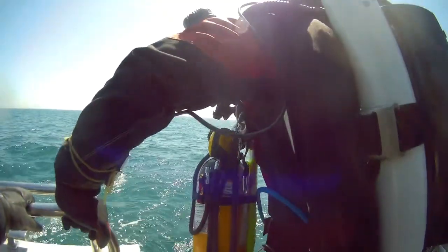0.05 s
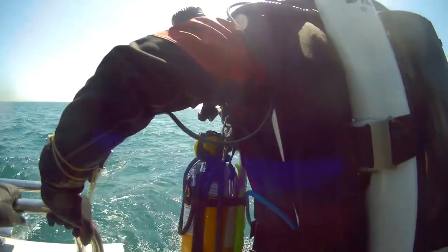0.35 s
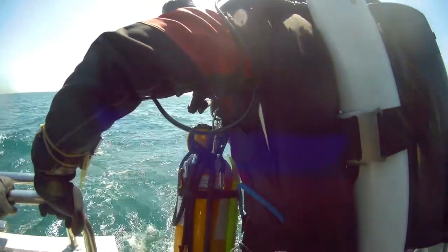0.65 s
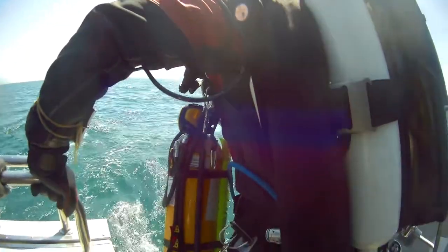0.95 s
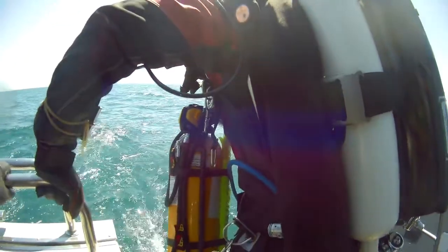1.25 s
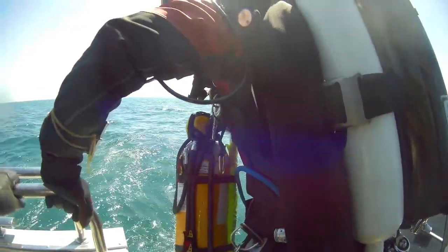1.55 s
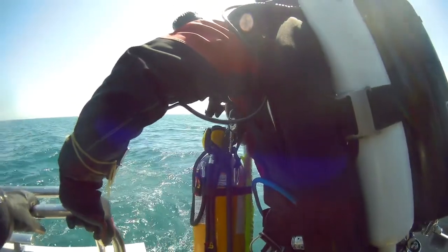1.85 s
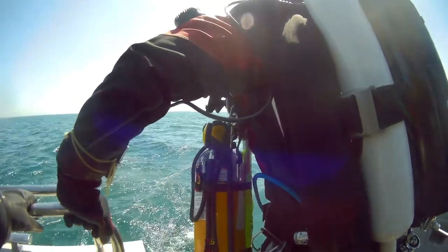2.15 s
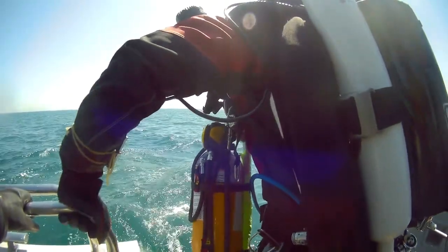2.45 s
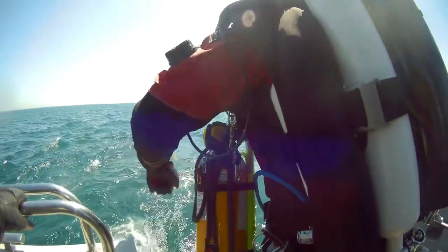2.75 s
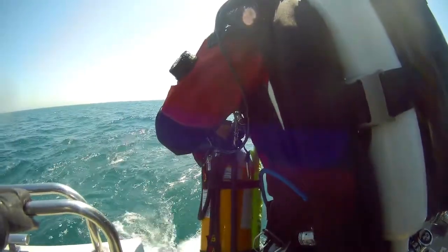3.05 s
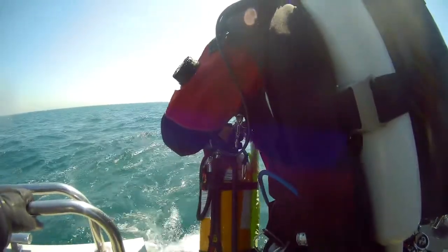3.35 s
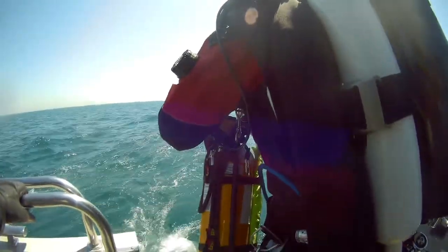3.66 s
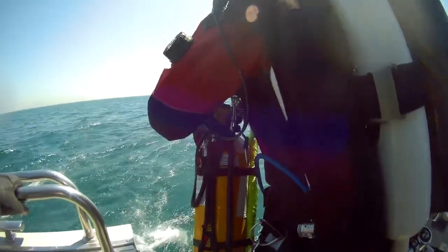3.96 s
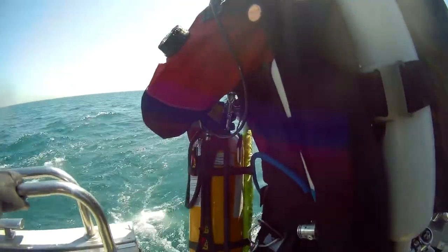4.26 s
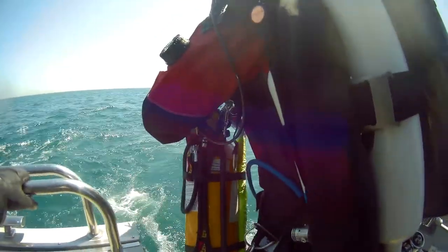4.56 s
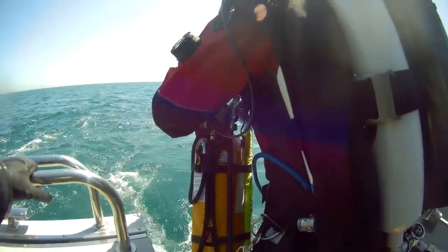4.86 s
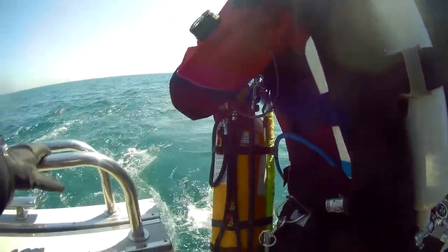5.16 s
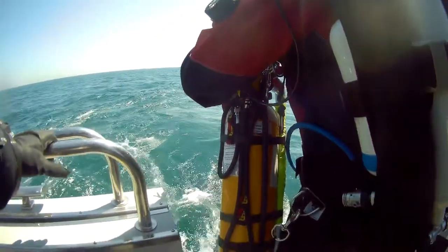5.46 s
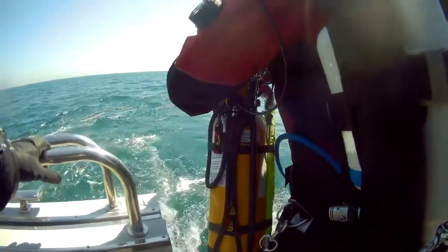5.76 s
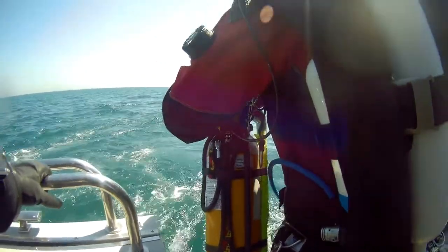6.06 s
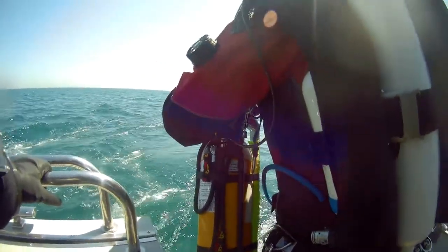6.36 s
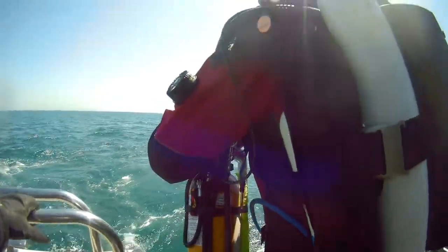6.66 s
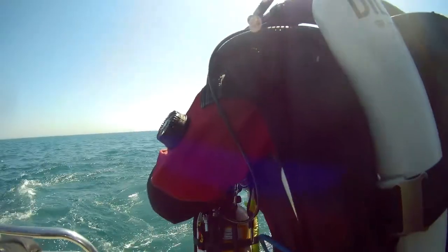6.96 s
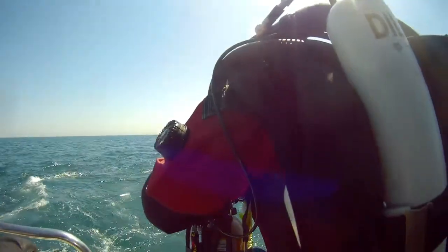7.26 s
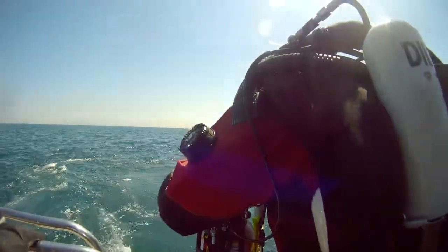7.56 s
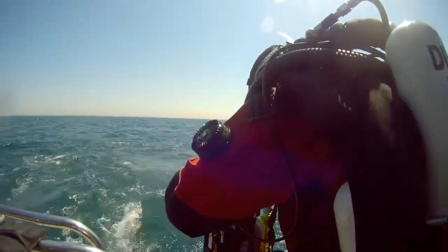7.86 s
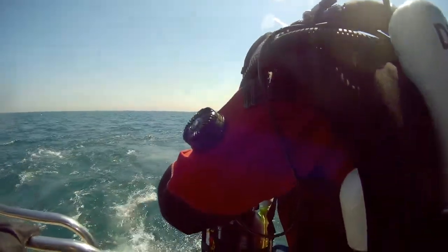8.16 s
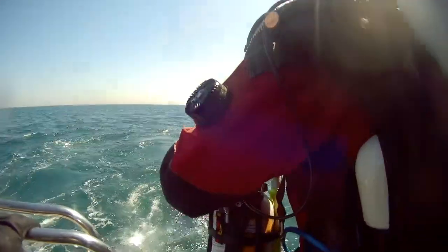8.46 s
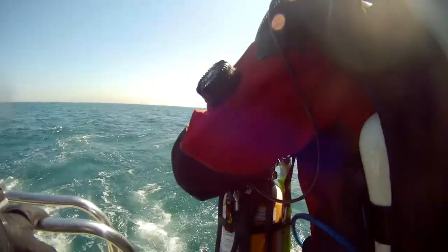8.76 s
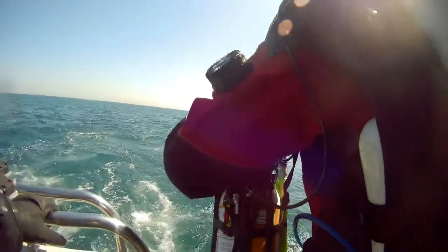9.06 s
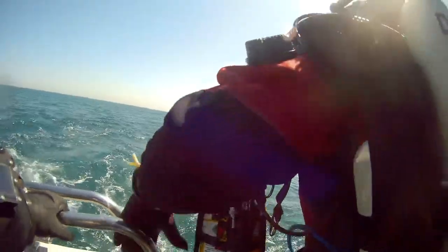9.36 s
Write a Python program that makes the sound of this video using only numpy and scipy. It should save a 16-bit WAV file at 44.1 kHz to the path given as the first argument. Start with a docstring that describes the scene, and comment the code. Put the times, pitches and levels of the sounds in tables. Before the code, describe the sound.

A camera housing clacks, thumps and scrapes on its mount while choppy sea washes faintly behind the plastic.

```python
"""The stern of a boat in a choppy sea, heard from inside a camera's waterproof case.
From the start, wake and wind come through the plastic as a faint wash. Within a second, jolts knock the
case: it clacks, its walls ring hollow, its mount thumps, and in between it rubs and judders.
A calmer stretch brings spray, soft bumps and ticks of loose gear. Around six seconds the knocks crowd
together, the hardest overloading the microphone. A few lighter ones end the scene as the wash swells."""
import sys
import numpy as np
from scipy import signal
from scipy.fft import rfft, irfft
from scipy.io import wavfile

SR = 44100
rng = np.random.default_rng(int(sys.argv[2]) if len(sys.argv) > 2 else 0)


def output_pcm(signal):
    """Save a mono or channel-first signal as 16-bit PCM at the path in sys.argv[1].

    Samples are clipped to [-1, 1] before scaling.
    """
    pcm = np.clip(np.atleast_2d(signal).T, -1, 1) * 32767
    wavfile.write(sys.argv[1], SR, np.round(pcm).astype(np.int16))


N = 423801
KNOCK_S, TOP_HZ = .02, 15900  # a typical knock's length; the highest pitch let through

# The tone of the sea through the plastic. Each row: frequency in Hz, relative level in dB.
SEA_TONE = [(20, 17), (65, 18), (130, 5), (300, 8.5), (750, 2), (1630, 12.5), (2250, -1.5), (2950, 4.5),
            (3200, -1.5), (3550, 1.5), (4050, 4.5), (4700, -6.5), (6000, 2.5), (7100, 1.5), (8000, 0),
            (9400, 2.5), (10300, -2), (16000, -18)]
# The wake's rush as the boat drives through the chop. Each row: time in seconds, relative level in dB.
WAKE_RUSH = [(0, -70), (2.35, -69), (2.95, -60), (3.6, -68), (4.3, -67), (5.7, -57.5), (6.6, -59.5),
             (7.3, -70), (8.1, -68.5), (9.6, -60.5)]
# Waves breaking along the hull. Each row: crest time and length in seconds, relative level in dB.
HULL_WAVES = [(0.616, 1, -61.5), (1.506, 0.69, -62.5), (4.487, 0.36, -60.5), (8.204, 0.42, -59),
              (8.509, 0.47, -59.5), (9.07, 0.47, -62)]
# The whine of the camera's electronics. Each row: pitch in Hz, level in dB.
CAMERA_WHINE = [(6857, -77)]
# Jolts that knock the case. Each row: start in seconds, levels of clack, crack, wall and thump in dB,
# pitches of clack and thump in Hz, contact time in seconds.
JOLTS = [(0.48, -28, -31.5, -36, -38, 1214, 83, .0022), (0.617, -29, -37, -42, -39.5, 1130, 112, 0.0024),
         (0.697, -35.5, -50, -44.5, -36.5, 1160, 114, 0.0019),
         (0.8258, -20.5, -38, -28.5, -34, 1400, 78.5, 0.0067),
         (0.838, -14, -18.5, -28.5, -14, 1400, 75, .0013),
         (1.452, -34.5, -49, -30.5, -30.5, 1315, 86, 0.0028),
         (1.504, -46.5, -67.5, -42.5, -39.5, 1160, 109.5, 0.0032),
         (2.075, -33, -54.5, -39.5, -30, 1277, 83.7, 0.0037),
         (3.752, -54.5, -62.5, -63, -45.5, 1312, 91, 0.0024),
         (4.435, -34, -49, -38, -35.5, 1276, 86.5, 0.0056),
         (4.474, -23.5, -39.5, -34.5, -32, 1310, 88, 0.0024),
         (4.751, -46.5, -59, -60, -35.5, 1430, 99.7, 0.002),
         (5.106, -18.5, -25, -24.5, -27, 1370, 103, 0.0023),
         (5.776, -18.5, -30, -29.5, -32.5, 1470, 94, 0.00307),
         (5.897, -19.5, -36, -24, -19.5, 1400, 86.6, 0.0051),
         (6.097, -30, -42, -34.5, -30, 1240, 86, 0.0019),
         (6.173, -20, -34.5, -31, -27.5, 1337, 85.5, 0.003),
         (6.39, -31, -53.5, -33.5, -26, 1330, 70, 0.0077),
         (6.415, -13, -28.5, -16, -25.5, 1358, 64, 0.0032),
         (6.567, -19.5, -35.5, -23, -19.5, 1284, 75.5, 0.0075),
         (6.591, -33, -54, -32.5, -23.5, 1210, 68, 0.0023),
         (6.609, -38.5, -66.5, -36.5, -27, 1230, 63, 0.0061),
         (6.664, -17, -31, -18, -17, 1233, 65.4, 0.0035), (6.753, -42, -54.5, -47.5, -33, 1220, 67, 0.011),
         (6.822, -54.5, -63, -49, -36.5, 1246, 69, 0.0049),
         (8.088, -33.5, -44.5, -32.5, -33.5, 1336, 82, 0.006),
         (8.183, -42, -56, -36, -43, 1240, 101, 0.0038), (8.529, -53, -66, -45, -45.5, 1310, 97, 0.0036),
         (8.891, -30, -42.5, -26.5, -25.5, 1260, 85.3, 0.0073),
         (9.405, -36, -63, -35.5, -26.5, 1220, 69.5, 0.0022)]
# The struck case's modes (the notes it rings at): a middle clack, a bright crack and the hollow walls.
# Each row: pitch in Hz, width in Hz (wider dies sooner), relative level in dB.
CLACK_MODES = [(1189, 53, -0.5), (1310, 120, 4), (1430, 110, -1.5), (1644, 120, 1), (1895, 440, -1.5)]
CRACK_MODES = [(2470, 200, -1), (2640, 240, 7.5), (3520, 340, 13), (3860, 140, 6), (5320, 280, -9),
               (6500, 1900, -10), (8100, 960, -13.5)]
WALL_MODES = [(170, 80, -8), (347, 21, 0.5), (440, 75, -3.5), (506, 23, 1), (585, 80, -6), (740, 50, -5.5)]
# The case rubs on its mount as the boat rolls.
# Each row: middle time and length in seconds, levels of scrape, wall and rasp in dB.
CASE_RUBS = [(0.552, 0.14, -40.5, -38, -50), (0.762, 0.089, -47.5, -42.5, -54),
             (0.833, 0.094, -37.5, -34.5, -44), (4.917, 0.13, -47.5, -51, -54.5),
             (4.992, 0.095, -42.5, -45, -48.5), (5.065, 0.14, -54.5, -47.5, -68),
             (5.213, 0.24, -45.5, -52.5, -48.5), (5.563, 0.27, -43, -57, -50),
             (5.837, 0.29, -39.5, -45.5, -51), (5.89, 0.035, -21, -32, -67),
             (5.924, 0.13, -38.5, -54.5, -74), (6.269, 0.089, -33, -36.5, -55), (6.37, 0.31, -39, -42, -54),
             (6.457, 0.1, -41, -37.5, -75), (6.56, 0.1, -40, -36.5, -51), (8.469, 0.29, -66, -51, -72),
             (9.028, 0.13, -58, -46.5, -77)]
# The rubbed case's modes: a scrape and a higher rasp.
# Each row: pitch in Hz, width in Hz, relative level in dB.
SCRAPE_MODES = [(1080, 120, -9), (1470, 320, 3.5), (1840, 120, -7), (2530, 300, -14)]
RASP_MODES = [(3530, 370, 0), (4100, 160, -4), (5350, 170, -15.5), (5930, 220, -12), (7100, 400, -12)]
# The tone of the shaking mount. Each row: frequency in Hz, relative level in dB.
JUDDER_TONE = [(20, -6.5), (80, 0.5), (140, -6), (1000, -50.5)]
# Hisses of spray. Each row: middle time in seconds, level in dB, pitch in Hz, fade-in time in seconds.
SPRAY_HISSES = [(1.718, -58.5, 8000, 0.073), (1.721, -58.5, 3950, 0.07), (3.24, -52, 7340, 0.042)]
# Soft bumps of the hull. Each row: middle time in seconds, level in dB, average pitch in Hz.
HULL_BUMPS = [(1.893, -47, 95.3), (3.004, -45, 78.4), (5.049, -38, 85), (5.694, -39.5, 102),
              (5.861, -32, 150), (9.114, -43, 101)]
# Loose gear touching the case. Each row: start in seconds, level in dB, favoured pitch in Hz.
GEAR_TICKS = [(2.181, -54, 1210), (2.553, -51.5, 1170), (2.995, -54, 1310), (4.626, -51, 1380),
              (5.014, -46.5, 1490), (6.372, -34.5, 1330)]


def amp(db):
    """Turns decibels into a gain to multiply by."""
    return 10 ** (np.asarray(db) / 20)


def unit(x):
    """Scales a signal to an average (rms) level of 1."""
    return x / np.sqrt(np.mean(x ** 2) + 1e-20)


def sized(x, db):
    """Gives a short sound the energy of KNOCK_S seconds at this level."""
    return amp(db) * x * np.sqrt(KNOCK_S * SR / np.sum(x ** 2))


def add(mix, start_s, sound):
    """Mixes a sound in at a given time."""
    part = mix[max(round(start_s * SR), 0):][:len(sound)]
    part += sound[:len(part)]


def band(x, low_hz, high_hz, order=2):
    """Keeps what lies between two frequencies."""
    edges = [low_hz, min(high_hz, SR / 2 - 1)]
    return signal.sosfilt(signal.butter(order, edges, "band", fs=SR, output="sos"), x)


def noise(tone):
    """Noise shaped by a tone table."""
    hz, db = np.transpose(tone)
    shape = amp(np.interp(np.log(np.fft.rfftfreq(N, 1 / SR) + 1), np.log(hz), db))
    return unit(irfft(rfft(rng.standard_normal(N)) * shape, N))


def wander(rate):
    """A smooth random curve that turns about `rate` times a second."""
    keep = np.exp(-(np.fft.rfftfreq(N, 1 / SR) / rate) ** 2)
    return unit(irfft(rfft(rng.standard_normal(N)) * keep, N))


def swell(length_s, point=1):
    """A smooth rise and fall; a higher `point` sharpens the peak."""
    return np.hanning(max(round(length_s * SR), 3)) ** point


def sea(boost_db=6, churn_db=1.78, fizz_db=1.5):
    """The wake churns and its foam fizzes unevenly; each breaking wave adds to the rush."""
    wash = noise(SEA_TONE)
    foam = band(wash, 4500, 16000, order=1)
    wash += foam * (amp(fizz_db * wander(45)) - 1)
    times, rush_db = np.transpose(WAKE_RUSH)
    power = amp(np.interp(np.arange(N) / SR, times, rush_db)) ** 2
    for crest, length, db in HULL_WAVES:
        add(power, crest - length / 2, (amp(db) * swell(length)) ** 2)
    return np.sqrt(power) * amp(boost_db + churn_db * wander(14)) * wash


def electronics(hiss_db=-78):
    """The camera's own steady hiss and thin whine."""
    t = np.arange(N) / SR
    whine = sum(amp(db) * np.sqrt(2) * np.sin(2 * np.pi * hz * t) for hz, db in CAMERA_WHINE)
    return whine + amp(hiss_db) * rng.standard_normal(N)


def contact_force(t, contact_s, grit=0.47, chatter=0.24, chatter_s=0.0045):
    """A sharp blow lands amid a gritty push that swells and lets go; a faint chatter follows."""
    grind, rattle = rng.standard_normal((2, len(t)))
    blow = np.zeros(len(t))
    blow[round(contact_s * SR / 2)] = np.exp(-contact_s / 0.0025)  # weaker in a long contact
    grind = sized(grind * t * np.exp(-2 * t / contact_s), 0)
    rattle = sized(rattle * np.exp(-t / chatter_s), 0)
    return blow * np.sqrt(KNOCK_S * SR) + grit * grind + chatter * rattle


def rebound(force, contact_s, db, delay_s=.033, soft_hz=1350):
    """The case swings back for a duller second touch, stronger after a long contact."""
    again = np.pad(band(force, 20, soft_hz, order=4), (round(delay_s * SR), 0))[:len(force)]
    return force + amp(db) * contact_s / KNOCK_S * again


def ring(force, modes):
    """A force sets each mode ringing and dying away."""
    out = np.zeros(len(force))
    for hz, width, db in modes:
        decay, angle = np.exp(-np.pi * width / SR), 2 * np.pi * hz / SR
        feedback = [1, -2 * decay * np.cos(angle), decay ** 2]
        out += amp(db) * np.sqrt(width) * signal.lfilter([1, -1], feedback, force)
    return out


def clack_modes(pitch_hz, favour_db=8, reach_hz=110):
    """The spot where a blow lands favours the modes near one pitch."""
    return [(hz, width, db + favour_db * np.exp(-((hz - pitch_hz) / reach_hz) ** 2))
            for hz, width, db in CLACK_MODES]


def mount_swing(t, hz, fade_cycles=2.2, rise_s=0.0017, shudder_db=-10, shudder_s=0.018):
    """The mount takes a moment to swing out, and shudders as it does."""
    turns = hz * t
    sway = np.sin(2 * np.pi * turns) * np.exp(-turns / fade_cycles)
    overtone = 0.45 * np.sin(2 * np.pi * 1.8 * turns) * np.exp(-turns)
    rise = 1 - np.exp(-t / rise_s)
    shudder = band(rng.standard_normal(len(t)) * np.exp(-t / shudder_s), hz, 2 * hz)
    return sized((sway + overtone) * rise, 0) + sized(shudder, shudder_db)


def knocks():
    """Each jolt rings the case high, middle and low; the mount swings on more slowly."""
    t, out = np.arange(SR // 3) / SR, np.zeros(N)
    for start, clack_db, crack_db, wall_db, thump_db, clack_hz, thump_hz, contact_s in JOLTS:
        force = contact_force(t, contact_s)
        # Soft blows, with little crack, have a rounder clack.
        cutoff_hz = max(2700 * amp(0.16 * (crack_db - clack_db)), clack_hz)
        clack = ring(rebound(force, contact_s, db=-12), clack_modes(clack_hz))
        crack = ring(force, CRACK_MODES)
        wall = ring(rebound(force, contact_s, db=-4), WALL_MODES)
        thump = rebound(mount_swing(t, thump_hz), contact_s, db=2)
        add(out, start, sized(band(clack, 1050, cutoff_hz, order=4), clack_db))
        add(out, start, sized(band(crack, 1500, 9500, order=4), crack_db))
        add(out, start, sized(band(wall, 190, 820, order=4), wall_db))
        add(out, start, sized(thump, thump_db))
    return out


def rub_gains(rest_db=-72):
    """Each rub presses and lets go, over a light contact that never stops."""
    scrape, wall, rasp = np.full(N, amp(rest_db)), np.full(N, amp(rest_db)), np.zeros(N)
    for middle, length, *levels in CASE_RUBS:
        for gain, db in zip((scrape, wall, rasp), levels):
            add(gain, middle - length / 2, amp(db) * swell(length, point=1.3))
    return scrape, wall, rasp


def sing(friction, modes):
    """The case picks out the parts of the friction noise near its modes."""
    return unit(sum(amp(db) * unit(band(friction, hz - width / 2, hz + width / 2))
                    for hz, width, db in modes))


def rubbing(grip_db=3, slips_per_s=450, crackle_db=4, judder_db=-10, judder_follows=0.69):
    """An uneven grip makes the case scrape and rasp and the mount judder; tiny slips ring the walls."""
    scrape_gain, wall_gain, rasp_gain = rub_gains()
    grip = amp(grip_db * np.tanh(wander(37)))
    friction = rng.standard_normal(N) * grip * amp(crackle_db * np.tanh(wander(260)))
    slips = np.sign(friction) * grip * (rng.random(N) < slips_per_s / SR)
    scrape = scrape_gain * sing(friction, SCRAPE_MODES)
    rasp = rasp_gain * sing(friction, RASP_MODES)
    wall = wall_gain * unit(band(ring(slips, WALL_MODES), 100, 820, order=4))
    judder = wall_gain ** judder_follows * amp(judder_db) * unit(noise(JUDDER_TONE) * grip)
    return scrape + rasp + wall + judder


def spray():
    """Spray makes a high hiss that quickly fades in and out."""
    out = np.zeros(N)
    for middle, db, hz, fade_s in SPRAY_HISSES:
        hiss = unit(band(rng.standard_normal(SR), hz / 1.15, hz * 1.12))[:int(2 * fade_s * SR)]
        add(out, middle - fade_s, amp(db) * hiss * np.hanning(len(hiss)))
    return out


def bumps(length_s=0.032, sag=0.14):
    """A soft push from the hull rocks the mount a few times, slowing as it lets go."""
    push, out = swell(length_s), np.zeros(N)
    for middle, db, hz in HULL_BUMPS:
        turns = np.cumsum(hz * np.linspace(1 + sag, 1 - sag, len(push))) / SR
        add(out, middle - length_s / 2, sized(push * np.sin(2 * np.pi * turns), db))
    return out


def ticks(contact_s=0.00076):
    """Light touches of loose gear ring only the case's clack."""
    t, out = np.arange(SR // 10) / SR, np.zeros(N)
    for start, db, hz in GEAR_TICKS:
        clack = ring(contact_force(t, contact_s), clack_modes(hz))
        add(out, start, sized(band(clack, 1200, 2100), db))
    return out


def scene():
    """All the sounds together, in one channel."""
    return (sea() + electronics() + knocks() + rubbing() + spray() + bumps() + ticks())[None]


def record(dry, ceiling=0.52, limit_db=-11, recovery_db_per_s=75, lift_db=5, dip=2.4, lag_s=0.011):
    """The microphone overloads on the hardest knocks, and a slow limiter then briefly dips the level."""
    flattened = np.clip(dry, -ceiling, ceiling)
    bright = flattened + amp(lift_db) * band(flattened, 13000, TOP_HZ)  # lifts the highest treble
    power_db = 10 * np.log10(signal.lfilter(np.ones(256) / 256, 1, dry[0] ** 2) + 1e-12)
    fall_db = np.arange(N) * recovery_db_per_s / SR
    peak_db = np.maximum.accumulate(power_db + fall_db) - fall_db  # jumps up, then sinks steadily
    over_db = np.maximum(peak_db - limit_db, 0)
    late_db = np.pad(over_db, (round(lag_s * SR), 0))[:N]
    smooth = np.exp(-1 / (0.003 * SR))
    dipped = bright / amp(dip * signal.lfilter([1 - smooth], [1, -smooth], late_db))
    treble_cut = signal.firwin(511, TOP_HZ, window=("kaiser", 9), fs=SR)
    return signal.oaconvolve(dipped, treble_cut[None], "same")


dry = scene()
out = record(dry)
output_pcm(out)
```